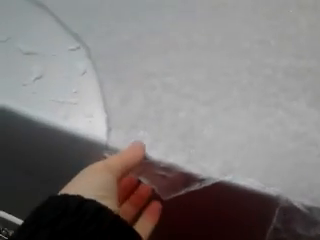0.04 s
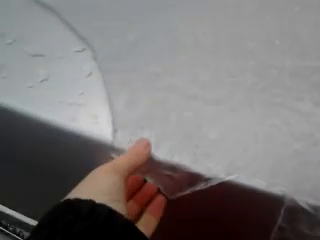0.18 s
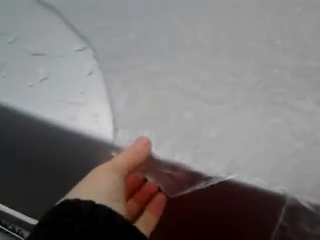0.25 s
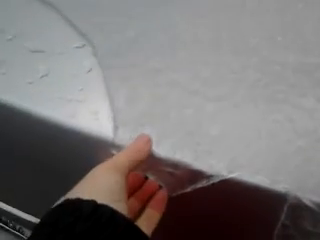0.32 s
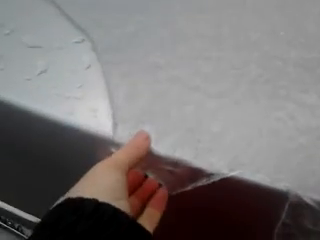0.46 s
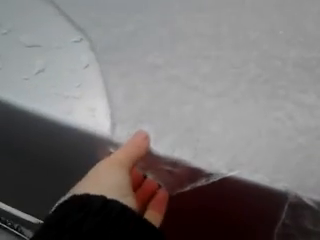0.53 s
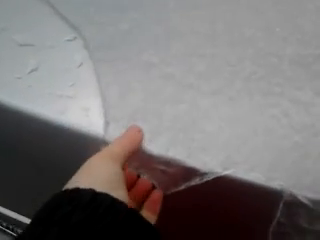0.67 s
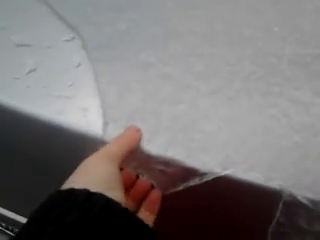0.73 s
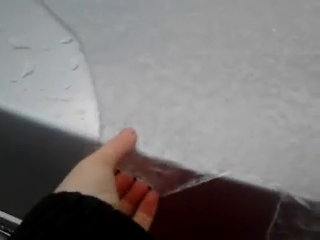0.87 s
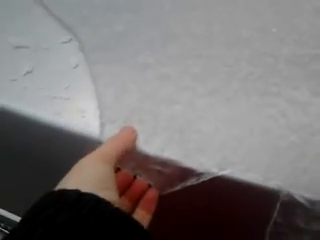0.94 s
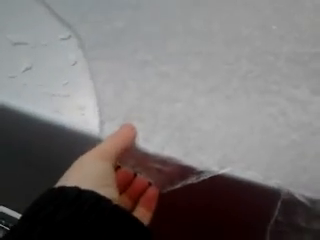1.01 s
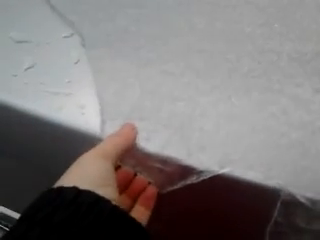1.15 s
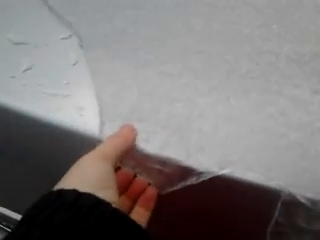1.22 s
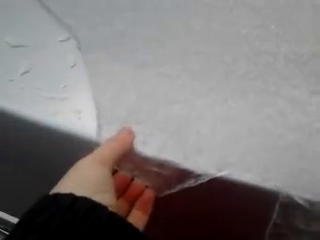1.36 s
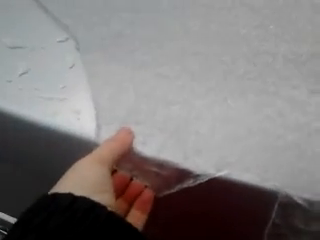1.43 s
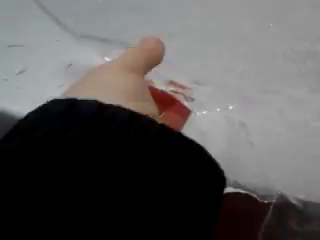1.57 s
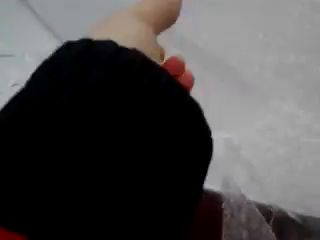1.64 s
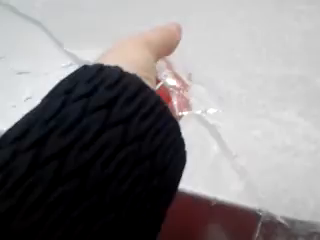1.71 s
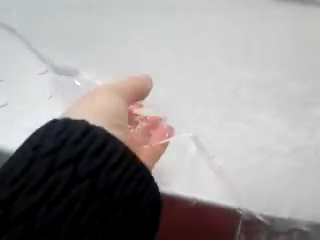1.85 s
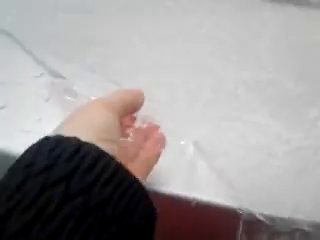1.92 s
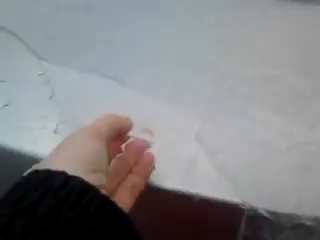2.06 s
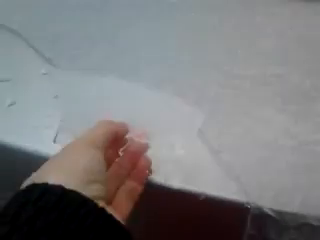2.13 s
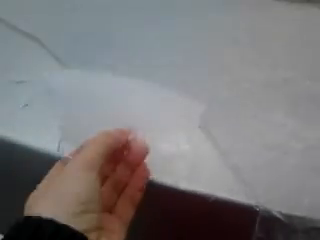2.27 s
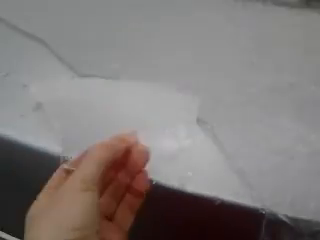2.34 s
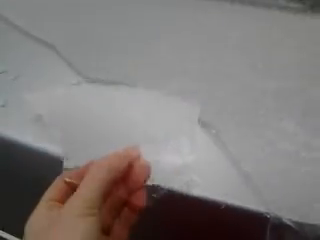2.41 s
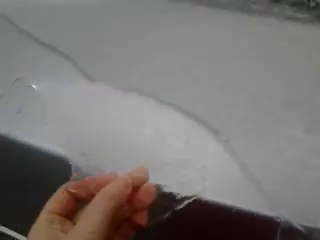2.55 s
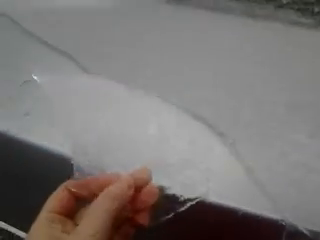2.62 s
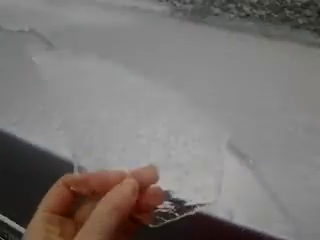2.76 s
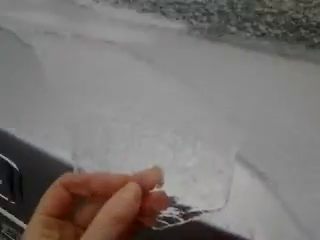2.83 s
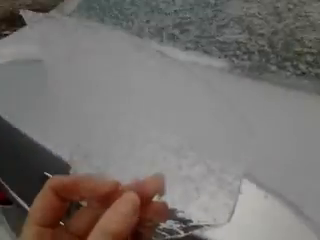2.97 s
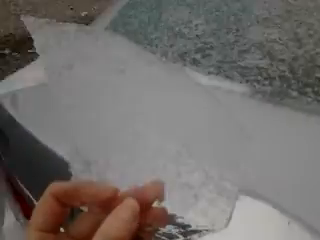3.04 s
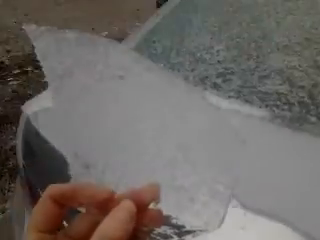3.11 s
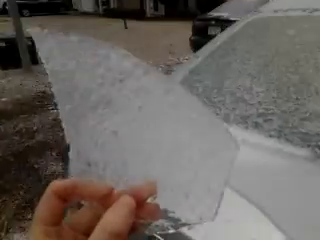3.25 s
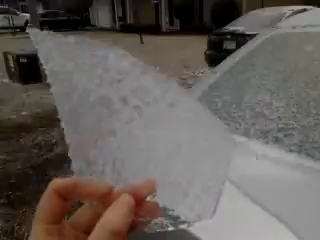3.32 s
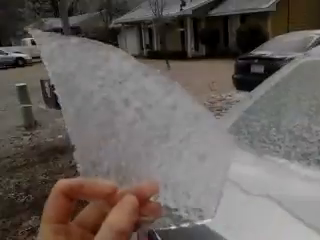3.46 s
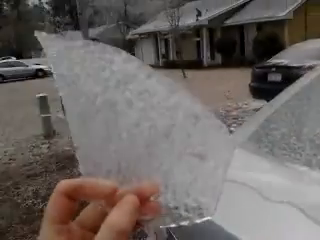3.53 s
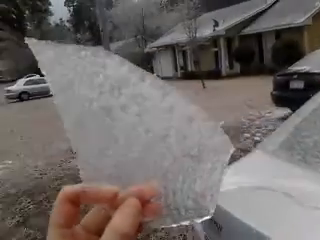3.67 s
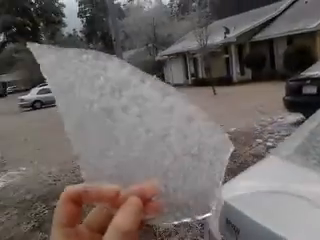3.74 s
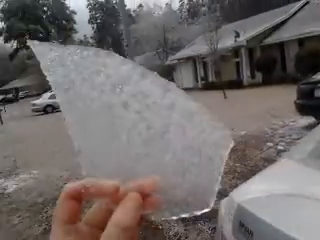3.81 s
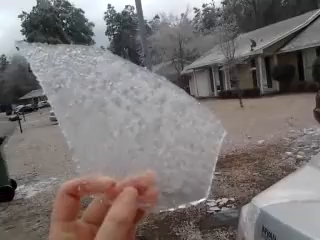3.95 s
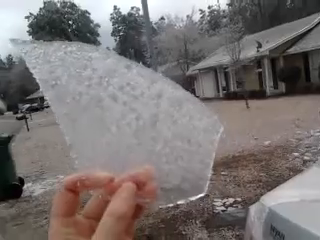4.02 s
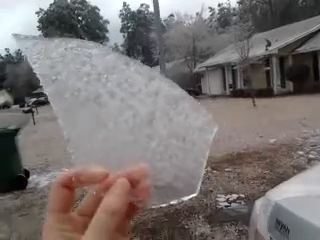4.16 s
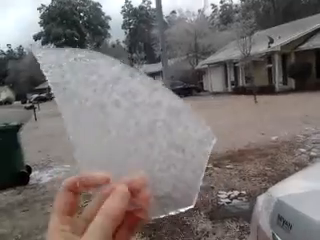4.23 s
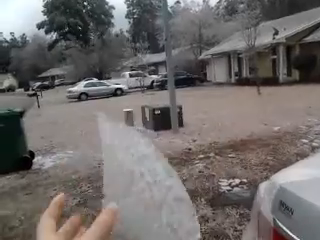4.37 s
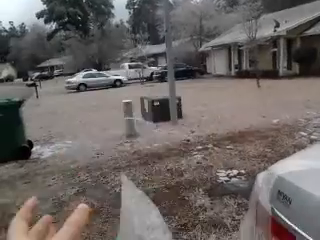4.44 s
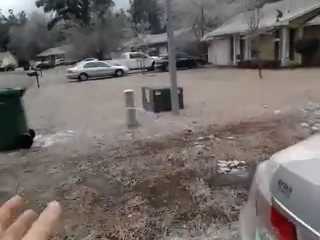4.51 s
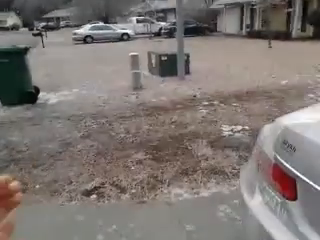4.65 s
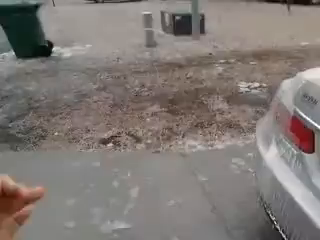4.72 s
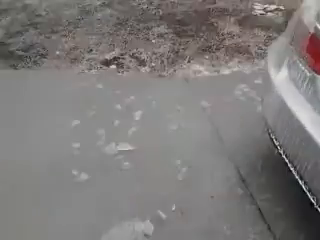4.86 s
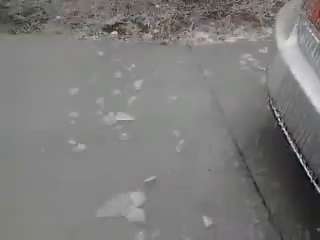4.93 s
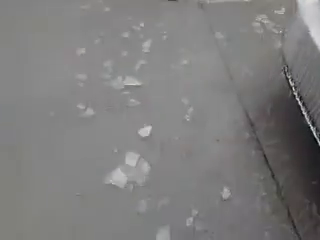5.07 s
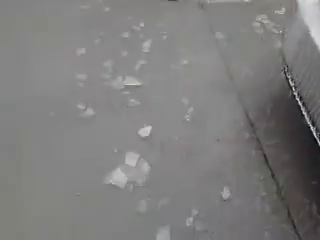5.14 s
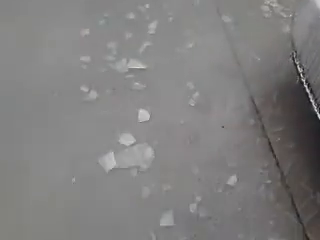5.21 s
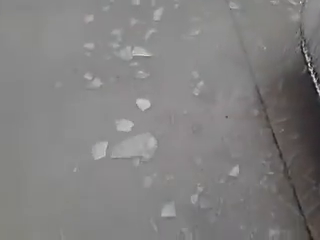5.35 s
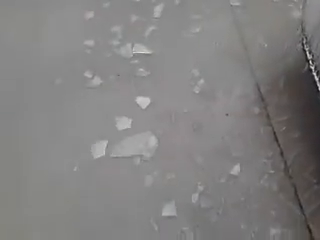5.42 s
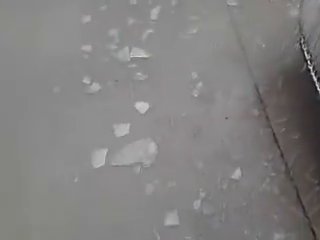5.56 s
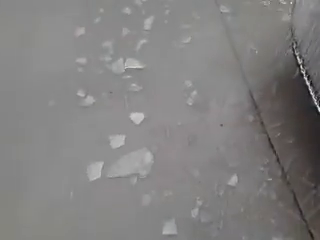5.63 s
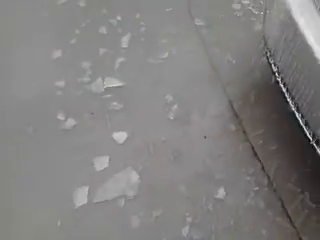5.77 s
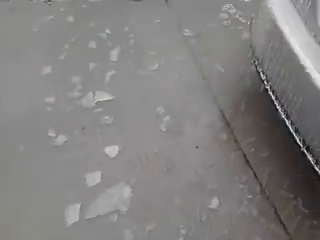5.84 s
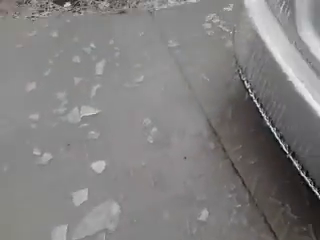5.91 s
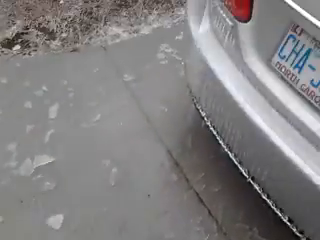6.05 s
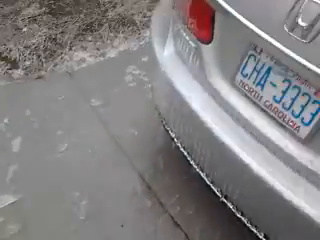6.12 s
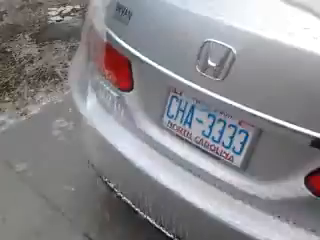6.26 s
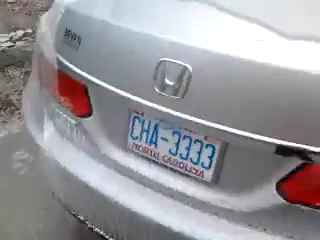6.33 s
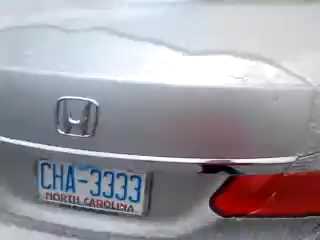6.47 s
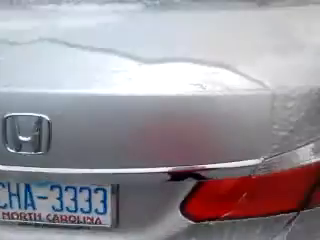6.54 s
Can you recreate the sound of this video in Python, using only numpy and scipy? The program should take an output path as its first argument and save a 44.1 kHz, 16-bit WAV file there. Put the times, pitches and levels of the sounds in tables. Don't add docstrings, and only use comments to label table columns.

```python
import sys
import numpy as np
from scipy import signal
from scipy.fft import rfft, irfft, next_fast_len
from scipy.io import wavfile
from scipy.ndimage import uniform_filter1d

SR = 44100
rng = np.random.default_rng(int(sys.argv[2]) if len(sys.argv) > 2 else 0)


def gain_from_decibels(decibels):
    exponent = np.asarray(decibels, float) / 20
    return 10 ** exponent


def persist_wave(psi):
    counts = np.round(np.clip(psi, -1, 1) * 32767).astype(np.int16)
    wavfile.write(sys.argv[1], SR, np.atleast_2d(counts).T)


N = 290619

# [f/Hz, level/dB]
HISS_SPECTRUM = [(290, -47), (500, 0.5), (687, -24), (760, -12), (841, -3), (1060, -2.5), (1170, -7),
                 (1940, -3.5), (2830, -11), (4900, -13), (7000, -6.5), (11200, -14), (15800, -20)]
STREET_SPECTRUM = [(12, -37), (20, -3), (145, -0.5), (189, -7.5), (258, -5), (375, -5.5), (497, -11.5),
                   (700, -13.5), (910, -13), (1540, -120)]
HISS_DB, STREET_DB = -57, -55.5

# [t/s, speed level/dB, pressure level/dB, length/s]
STROKES = [(.1, -36.5, -50.5, 0.024), (.15, -39, -46, 0.022), (.22, -39.5, -45.5, 0.017),
           (.35, -42.5, -51.5, 0.026), (.4, -50, -60, 0.0092), (.52, -40, -56, 0.013),
           (.585, -38.5, -52, 0.009), (.69, -45.5, -58, 0.024), (.74, -47.5, -50, 0.043),
           (.905, -43, -51, 0.041), (1.115, -39, -59, 0.022), (1.18, -57, -49.5, 0.027),
           (1.3, -54, -77, 0.11), (1.36, -42, -72, 0.016), (2.135, -59, -53, 0.029),
           (2.18, -64, -50.5, 0.031), (2.32, -48.5, -49, 0.027), (2.45, -52.5, -62, 0.065)]
# [t/s, speed level/dB, pressure level/dB, length/s]
HOLDS = [
    (.5, -59, -59, 0.98),
    (1.95, -58, -57.5, 0.4),
    (2.55, -60, -65.5, 0.04),
]
# [f/Hz, level/dB]
FIZZ_SPECTRUM = [(2650, -32), (3800, -18.5), (5400, -15.5), (6840, -8.5), (9270, -6), (11800, -7.5),
                 (14800, -16), (16000, -15), (16500, -50)]
SCRAPE_SPECTRUM = [(450, -30), (850, -5), (1300, -6), (2300, 1), (3600, -3), (5000, -15), (8000, -40)]
# [f/Hz, level/dB]
RUMBLE_SPECTRUM = [(35, -41), (60, 2.5), (220, 3.5), (308, 0), (651, -12.5), (800, -10), (1040, -31),
                   (1760, -120)]
LID_RUMBLE_DB = 1.5

# [t/s, level/dB, f/Hz]
CHIPS = [(.0028, -36.5, 3060), (.0216, -39, 3200), (.0408, -37, 2220), (.0694, -36, 2590),
         (.1126, -34, 2390), (.1556, -30, 1750), (.156, -28, 2800), (.576, -36, 2900), (.5814, -34, 2020),
         (.6175, -35, 2220), (.6815, -37, 2020), (.7568, -31.5, 2160), (.8483, -40, 1850),
         (.879, -37, 2550), (.9371, -33.5, 1740), (.9979, -39, 2460), (1.1524, -32, 3700),
         (1.1567, -35, 2220), (1.6704, -34, 3120), (1.689, -27, 3030), (1.7443, -33, 2450),
         (1.788, -18, 2060), (1.8005, -12, 2300), (1.806, -20, 1040), (1.828, -18, 2110), (1.838, -39, 900),
         (1.853, -35.5, 660), (1.868, -48, 775), (1.882, -46, 700), (2.1434, -30, 2330), (2.156, -35, 3100),
         (2.1913, -25.5, 2140), (2.2179, -42, 3020), (2.339, -32, 790), (2.548, -27, 1040),
         (2.356, -32, 3180), (2.4241, -36, 3360), (2.4552, -31, 3200), (3.551, -38, 330), (3.556, -43, 510),
         (3.565, -25.5, 2900), (3.568, -32, 1590), (3.569, -30.5, 815), (3.5842, -37, 1110),
         (3.5939, -34.5, 1770), (3.6516, -43, 2410), (3.934, -41, 3700), (3.934, -40, 5600),
         (4.0538, -38.5, 1150), (4.0962, -40, 3830), (4.0962, -42, 5800), (2.011, -29.5, 260),
         (2.012, -20.5, 860), (2.132, -28.5, 250), (2.199, -34, 262), (1.801, -25.5, 268), (.152, -33, 930),
         (6.368, -34.5, 1320), (6.5715, -34, 1590)]
# [t/s, level/dB]
FROST = [(.0465, -42), (0.0666, -36), (0.094, -32), (0.1533, -36), (0.304, -38), (.4538, -48), (.576, -37),
         (0.722, -37), (.7298, -41), (0.773, -40), (0.794, -37), (.8794, -43), (1.0153, -40.5),
         (1.126, -33), (1.2574, -40), (1.3523, -33), (1.429, -38), (2.143, -43), (2.653, -36), (3.138, -37),
         (3.586, -45), (3.935, -44), (4.0963, -38), (4.3112, -40), (5.227, -44), (5.243, -38), (5.267, -39),
         (1.555, -37), (1.69, -35), (2.0037, -36), (4.8338, -30), (5.155, -30), (5.311, -42), (5.197, -41),
         (5.422, -41), (5.841, -39.5)]
# [t/s, level/dB, f/Hz]
SNAPS = [(.2185, -18, 2520), (.336, -13, 7960), (1.6945, -3.5, 2900), (1.6945, -20, 6800),
         (1.776, -12, 7650), (1.8275, -12, 7200), (1.738, -26, 6860), (1.7385, -12.5, 2780),
         (2.0064, -2, 2550), (2.0066, -13, 8500), (2.011, -12, 2900), (2.55, -13.5, 7700),
         (4.9882, -6, 5740), (1.566, 10, 6800), (1.5735, 1, 2850), (4.8385, -3, 1000), (4.8565, -15, 7200),
         (5.027, 4.5, 6270), (2.2, -28, 2060), (2.3045, -23, 7500), (.2075, -28, 2000), (5.0765, -12, 3970)]

# [t/s, plate level/dB, bright edge level/dB]
TICKS = [(0.056, -42.5, -35), (0.086, -49, -36), (0.1033, -46, -37), (0.1433, -47, -31),
         (0.2085, -31.5, -31.5), (0.218, -35.5, -28.5), (.287, -41.5, -43), (0.3161, -38.5, -34),
         (0.3363, -40.5, -28), (0.3552, -38, -41), (0.3712, -39, -36.5), (0.495, -73, -39), (.52, -63, -44),
         (0.5848, -45, -38), (0.6715, -40.5, -35.5), (.708, -67, -40), (0.7427, -38, -40.5),
         (0.888, -47, -38), (0.904, -64, -39), (0.936, -42, -59), (0.967, -48, -43), (1.096, -47, -36.5),
         (1.112, -66, -40), (1.144, -36.5, -33.5), (1.1652, -39.5, -36), (1.213, -43.5, -43),
         (1.295, -48.5, -37), (1.3186, -55, -35.5), (1.364, -50, -40)]
# [t/s, plate level/dB, bright edge level/dB]
SLIPS = [
    (1.722, -41, -36),
    (2.112, -48.5, -46.5),
    (2.17, -37.5, -57),
    (2.1915, -53, -49),
    (2.1975, -42, -40.5),
    (2.34, -49, -60),
    (2.356, -45, -39),
    (2.398, -49, -41),
    (2.4467, -39.5, -39),
]
# [t/s, plate level/dB, bright edge level/dB]
HANDLING = [
    (2.9632, -47, -44),
    (2.9885, -43, -39),
    (3.568, -30.5, -43),
    (3.593, -51, -53),
    (3.6388, -43.5, -45),
    (3.9564, -43, -53),
    (4.026, -46, -46),
    (4.3161, -46, -43.5),
]
# [t/s, plate level/dB, bright edge level/dB]
STEPS = [
    (5.781, -42.5, -38),
    (5.92, -43, -41.5),
    (6.368, -40.5, -37.5),
    (6.39, -44, -50),
    (6.571, -42.5, -38),
    (6.586, -55, -40),
]
# [t/s, level/dB]
BUMPS = [(.07, -39.5), (0.146, -40), (1.1653, -47), (1.22, -42), (1.6693, -44), (1.708, -29), (1.848, -51),
         (2.155, -50), (2.34, -38), (4.06, -49), (4.512, -53), (5.894, -41), (5.996, -44.5), (6.14, -48)]
KNOCK_UNDER_DB = 8

# [t/s, plate level/dB, bright edge level/dB, low knock level/dB, length/ms]
CRACKS = [(1.5597, -17, -18, -34, 2.1), (1.5652, -11.5, -10.5, -26.5, 1.2), (1.5716, -4.5, -15, -21, 1.36),
          (1.6141, -37, -44, -41, 7.8), (1.6943, -12, -16, -28, 1.94), (1.738, -22, -26, -43, 0.64),
          (1.7747, -19.5, -20, -34, 2.5), (1.788, -46, -34, -51, 3.8), (1.8006, -22, -28, -25, 2.8),
          (1.8277, -32, -27.5, -24.5, 1.44), (2.007, -19.5, -20.5, -26.5, 1.7),
          (2.0116, -24, -19.5, -27, 0.84), (2.1293, -36, -36.5, -36.5, 1.6), (2.1784, -41, -46, -48, 2.9),
          (2.3043, -37.5, -34.5, -63, 2.4), (2.3179, -55, -39, -42.5, 4), (2.4552, -30.5, -34, -66, 0.57),
          (2.548, -34, -37, -35.5, 3)]
# [t/s, level/dB]
THUMPS = [(1.5647, -26.5), (1.5723, -23), (1.669, -40), (1.6944, -32), (1.7186, -30.5), (1.7733, -28.5),
          (1.789, -26), (1.801, -26.5), (1.812, -39), (1.8255, -39), (2.008, -54), (2.1303, -34),
          (2.192, -42), (2.1974, -39)]
THUMP_MS = 7.3
# [f/Hz, level/dB]
EDGE_SPECTRUM = [(2940, -55), (5000, -17.5), (7020, -2.5), (8200, -4.5), (9060, -2), (10800, -13.5),
                 (14300, -15), (16500, -55)]
# [f/Hz, width/Hz, level/dB]
PLATE_MODES = [(1854, 920, -0.5), (2900, 1410, 1.5), (4420, 1510, 1.5), (4970, 1500, -9.5)]
KNOCK_MODES = [(406, 237, -4), (850, 650, 2), (1310, 2500, -7)]
LID_MODES = [(125, 38, 1), (250, 50, -3.5), (330, 89, -4.5)]
DEBRIS_MODES = [(1230, 3300, -9.5), (2970, 980, 3), (3760, 1300, 0.5), (5000, 1160, 1), (5860, 3500, -9.5)]
# [t/s, fizz level/dB, body level/dB, length/s]
SPILLS = [
    (1.578, -34, -44, 0.02),
    (1.605, -47, -50, 0.069),
    (1.7, -47.5, -38, 0.069),
    (1.79, -37.5, -57, 0.033),
    (4.862, -29, -29.5, 0.033),
    (4.95, -53, -43.5, 0.078),
    (5.05, -36.5, -35.5, 0.15),
    (5.18, -53, -45.5, 0.13),
    (5.35, -46.5, -46, 0.058),
]

# [t/s, bright level/dB, dull level/dB, length/s]
SWINGS = [(2.97, -51.5, -52.5, 0.32), (3.14, -51, -53.5, 0.086), (3.35, -59, -63, 0.13),
          (3.56, -50, -49, 0.028), (3.68, -51.5, -62, 0.074), (4.05, -58.5, -56.5, 0.49),
          (4.45, -64, -75, 0.17), (4.81, -44.5, -53, 0.22), (5.68, -50.5, -52, 0.019),
          (5.79, -46.5, -53, 0.043), (6.23, -60, -49, 0.19), (6.52, -53.5, -56.5, 0.88)]
# [t/s, level/dB, length/s]
GRIPS = [
    (2.72, -65, 0.19),
    (3.17, -46, 0.057),
    (3.56, -44.5, 0.02),
    (5.79, -51, 0.062),
    (6, -58.5, 0.22),
    (6.49, -50.5, 0.032),
]
# [f/Hz, level/dB]
WEAVE_SPECTRUM = [(2710, -21), (4600, -14), (4840, -17), (6210, -8.5), (7210, -1.5), (8860, -4),
                  (10500, -8.5), (12300, -6), (15800, -11)]
FOLDS_SPECTRUM = [(350, -64), (600, -1), (879, -4.5), (1040, -1), (1650, -1.5), (2150, 2), (3400, -4.5),
                  (4700, -8), (6500, -13.5), (11000, -120)]

# [t/s, peak level/dB, f/Hz]
SPLINTER = [(3.8864, -36, 8400), (3.933, -39, 8300), (3.9883, -33, 8330), (4.032, -31, 7600),
            (4.097, -27, 8500), (4.2278, -39, 8250), (3.999, -44, 8200), (4.012, -45, 8300),
            (4.024, -41, 8400), (4.035, -36, 6900), (4.037, -35, 8540), (4.108, -43, 8550),
            (4.124, -45, 8500), (3.945, -53, 8400)]

# [t/s, plate level/dB, bright edge level/dB, low knock level/dB, length/ms]
BURST = [(4.8378, -6.5, -12.5, -11.5, 2.46), (4.8458, -7, -7, -40, 0.72), (4.8526, -10, -15, -57, 6.0),
         (4.855, -14.5, -9, -42, 4.1), (4.8654, -22, -44, -46, 1.3), (4.89, -42, -37.5, -47, 2.7),
         (4.948, -56, -34, -47, 2.4), (4.9796, -40, -37, -43.5, 2.1), (4.989, -39, -38, -52, 1.74),
         (4.991, -34, -29, -44.5, 3.8), (5.0148, -41, -29, -46, 4.8), (5.0257, -20, -15, -44, 3.5)]
# [t/s, level/dB, f/Hz]
RATTLE = [(4.891, -22, 5500), (4.911, -36, 2580), (4.9485, -23, 5160), (4.9615, -31, 3220),
          (5.0165, -15, 4350), (5.1535, -28, 4300), (5.1561, -28, 4970), (5.166, -27, 3300),
          (5.1854, -23, 3360), (5.1978, -26, 3620), (5.2225, -31, 3500), (5.2553, -37, 3530),
          (5.2755, -26, 3740), (5.2937, -22, 3140), (5.2992, -20.5, 3080), (5.3334, -40, 1260),
          (5.339, -36, 3300), (5.35, -32, 3000), (5.362, -38, 1030), (5.4069, -34, 2990),
          (5.4215, -30, 3190), (5.4487, -38, 4780), (5.4737, -32, 3340), (5.5482, -45, 3510),
          (5.101, -35, 4270), (5.111, -19, 6200), (5.1165, -22, 4960), (5.045, -30, 4340),
          (5.2985, -27, 7350), (5.431, -30, 4570), (5.293, -29, 4400)]
# [t/s, ring level/dB, bright edge level/dB, f/Hz]
SHARDS = [(4.9363, -30, -38, 2870), (4.9639, -29.5, -40, 3130), (5.0655, -29, -40, 2900),
          (5.0686, -29, -38, 3460), (5.0765, -25, -33, 3610), (5.086, -29, -39, 3020),
          (5.111, -27, -46, 3520), (5.117, -33, -38.5, 2900), (5.131, -39, -44, 3570),
          (5.1388, -30, -46, 2820), (5.145, -33, -41, 2970), (5.1611, -29.5, -38, 2700),
          (5.1797, -24.5, -35, 3700), (5.197, -38, -51, 3760), (5.219, -32.5, -51, 3370),
          (5.238, -34, -46, 3500), (5.2555, -38, -46, 3430), (5.274, -33, -49, 3420),
          (5.28, -36, -42, 3100), (5.29, -32, -51, 2900), (5.299, -29.5, -38, 3040),
          (5.3265, -39, -48, 3260), (5.346, -30.5, -34, 2570), (5.362, -40, -58, 2830),
          (5.3725, -28, -34, 2870), (5.383, -32, -38, 2760), (5.427, -36, -41, 3630),
          (5.438, -32.5, -38, 3100), (5.455, -38, -48, 3440), (5.496, -38, -52, 2940)]

# [f/Hz, t60/s]
ECHO_DECAY = [(300, 0.19), (2500, 0.072), (10000, 0.035)]

# [f/Hz, level/dB]
BAND_LOSS = [(1200, -25), (2000, -9), (3300, -2.6), (4700, -.5), (6000, -2.4), (8000, -5), (10500, -1.4),
             (13000, 0), (15500, .3)]
# [from t/s, to t/s]
CLICK_STRETCHES = [(.035, .05), (.16, .205), (.295, .35), (.655, .67), (1.082, 1.095), (1.275, 1.292),
                   (1.678, 1.69), (1.752, 1.772), (1.805, 1.822), (2.015, 2.022), (2.112, 2.145),
                   (2.385, 2.445), (2.535, 2.547), (3.922, 3.935), (4.09, 4.11), (4.922, 5.022),
                   (5.158, 5.202), (5.35, 5.44), (5.485, 5.5), (6.355, 6.367), (6.565, 6.585)]
TOP_HZ, QUIET_TOP_HZ = 16300, 15750


def unit(x):
    return x / np.sqrt(np.mean(x ** 2) + 1e-20)


def along(points, hz):
    f, v = np.transpose(points)
    return np.interp(np.log(hz + 1), np.log(f + 1), v)


def filtered(x, response):
    m = next_fast_len(N + SR // 2)
    hz = np.fft.rfftfreq(m, 1 / SR)
    return irfft(rfft(x, m) * response(hz), m)[:N]


def coloured(x, spectrum):
    return filtered(x, lambda hz: unit(gain_from_decibels(along(spectrum, hz))))


def resonant(x, modes):
    def response(f):
        h = 0
        for k, (centre, width, db) in enumerate(modes):
            damping = 1j * f * width
            h = h + (-1) ** k * gain_from_decibels(db) * damping / (centre * centre - f * f + damping)
        return h / np.sqrt(np.mean(abs(h) ** 2))
    return filtered(x, response)


def gritty(per_s, spread_db, share):
    size_db = spread_db * np.minimum(rng.exponential(1, N), 3)
    hits = (rng.random(N) < per_s / SR) * gain_from_decibels(size_db)
    grains = np.convolve(hits, np.hanning(110))[:N]
    share = np.clip(share, 0, 1)
    rough = unit(grains * rng.standard_normal(N))
    return np.sqrt(share) * rough + np.sqrt(1 - share) * rng.standard_normal(N)


def swells(rows, rise, fall):
    s, *dbs, length = np.transpose(rows)
    t = np.arange(0, N + 32, 32) / SR
    u = (t - s[:, None]) / np.maximum(length, .005)[:, None]
    power = np.exp(-np.where(u < 0, (u / rise) ** 2, abs(u) / fall))
    gains = np.sqrt(gain_from_decibels(2 * np.array(dbs)) @ power)
    return [np.interp(np.arange(N) / SR, t, gain) for gain in gains]


def bursts(times, dbs, widths_ms, rise=0.84, fall=0.99):
    out = np.zeros(N + SR)
    t = np.arange(-SR // 100, SR // 16) / SR
    noise = rng.standard_normal((len(times), len(t)))
    for s, db, ms, grain in zip(times, dbs, widths_ms, noise):
        u = 1000 * t / max(ms, .5)
        shape = np.where(u < 0, np.exp(-(u / rise) ** 2), np.exp(-abs(u) / fall))
        out[round(s * SR):][:len(t)] += gain_from_decibels(db) * shape * grain
    return out[SR // 100:][:N]


def rings(times, dbs, hzs, t60_s, rise_s):
    out = np.zeros(N + SR)
    t = np.arange(SR // 16) / SR
    for s, db, hz, t60, rise in np.broadcast(times, dbs, hzs, t60_s, rise_s):
        shape = gain_from_decibels(db - 60 * t / t60) * (1 - np.exp(-(t / rise) ** 2))
        out[round((s - 1.5 * rise) * SR):][:len(t)] += shape * np.sin(2 * np.pi * hz * t)
    return out[:N]


def ringing_pieces(rows, decay_cycles, onset_cycles):
    s, db, hz = np.transpose(rows)
    return rings(s, db + 5.0, hz, decay_cycles / hz, onset_cycles / hz)


def fractures(s, body_db, edge_db, knock_db, width_ms, lift_db, knock_lift_db):
    body = resonant(bursts(s, body_db + lift_db, width_ms), PLATE_MODES)
    bright = coloured(bursts(s, edge_db + lift_db, 1.11 * width_ms), EDGE_SPECTRUM)
    low = resonant(bursts(s, knock_db + knock_lift_db, 1.59 * width_ms, rise=0.53), KNOCK_MODES)
    return body + bright + low


def air():
    hiss, rumble = rng.standard_normal((2, N))
    return gain_from_decibels(HISS_DB) * coloured(hiss, HISS_SPECTRUM) + gain_from_decibels(STREET_DB) * coloured(rumble, STREET_SPECTRUM)


def drag():
    speed, pressure = swells(STROKES + HOLDS, rise=0.69, fall=0.81)
    grit = gritty(500, spread_db=3, share=0.3)
    fizz = coloured(grit, FIZZ_SPECTRUM)
    scrape = coloured(grit, SCRAPE_SPECTRUM)
    rumble = coloured(gritty(130, spread_db=1.5, share=0.16), RUMBLE_SPECTRUM)
    return speed * fizz + pressure * (gain_from_decibels(-3.0) * scrape + gain_from_decibels(LID_RUMBLE_DB) * rumble)


def chips():
    return ringing_pieces(CHIPS, decay_cycles=16, onset_cycles=1.2)


def frost():
    s, db = np.transpose(FROST)
    return coloured(bursts(s, db, np.full(len(s), .9)), EDGE_SPECTRUM)


def ticks():
    s, body, edge = np.transpose(TICKS + SLIPS + HANDLING + STEPS)
    small = fractures(s, body, edge, body - KNOCK_UNDER_DB, np.full(len(s), 1.9),
                      lift_db=1.0, knock_lift_db=-2.0)
    at, db = np.transpose(BUMPS)
    bumps = resonant(bursts(at, db, np.full(len(at), 3.5), rise=0.46), KNOCK_MODES)
    return bumps + small


def snaps():
    return ringing_pieces(SNAPS, decay_cycles=9, onset_cycles=.6)


def cracks():
    s, db = np.transpose(THUMPS)
    lid = resonant(bursts(s, db + 3.0, np.full(len(s), THUMP_MS), rise=0.5), LID_MODES)
    lid = filtered(lid, lambda hz: 1j * hz / (1j * hz + 80))
    return lid + fractures(*np.transpose(CRACKS), lift_db=0.0, knock_lift_db=1.0)


def crumbs():
    fizzing, crunching = swells(SPILLS, rise=0.47, fall=0.51)
    fizz = coloured(gritty(500, spread_db=1.5, share=0.55), EDGE_SPECTRUM)
    body = resonant(gritty(450, spread_db=2.5, share=0.71), DEBRIS_MODES)
    return gain_from_decibels(-3.0) * fizzing * fizz + gain_from_decibels(-4.0) * crunching * body


def coat():
    bright, dull = swells(SWINGS, rise=0.53, fall=0.79)
    hand, = swells(GRIPS, rise=0.4, fall=0.99)
    rub = gritty(600, spread_db=4.0, share=0.17)
    grip = coloured(gritty(88, spread_db=10.0, share=0.19), RUMBLE_SPECTRUM)
    return bright * coloured(rub, WEAVE_SPECTRUM) + dull * coloured(rub, FOLDS_SPECTRUM) + hand * grip


def splinter():
    s, db, hz = np.transpose(SPLINTER)
    return rings(s, db - 1, hz, t60_s=0.014, rise_s=0.00045)


def burst():
    s, body, edge, knock, width = np.transpose(BURST)
    push_modes = [(150, 130, 0), (930, 250, 1)]  # f/Hz, width/Hz, level/dB
    push = resonant(bursts(s, knock - 12, 2.0 * width, rise=0.24), push_modes)
    breaking = fractures(s, body, edge, knock, np.minimum(width, 3.5), lift_db=-1.0, knock_lift_db=-4.0)
    return push + breaking


def rattle():
    return ringing_pieces(RATTLE, decay_cycles=22, onset_cycles=1.6)


def shards():
    s, body, edge, hz = np.transpose(SHARDS)
    detune = 1 + 0.072 * rng.standard_normal((len(s), 2)).T
    near, upper = hz * [[.9], [2.2]] * detune
    ring = rings(s, body + 9, hz, t60_s=0.013, rise_s=0.00098)
    ring += rings(s, body + 3, near, t60_s=0.0044, rise_s=0.00116)
    ring += rings(s, edge + 3, upper, t60_s=0.0047, rise_s=0.00086)
    click = resonant(bursts(s, body - 3, np.full(len(s), 1.6)), DEBRIS_MODES)
    bright = bursts(s, edge - 4, np.full(len(s), 1.3))
    bright = coloured(coloured(bright, EDGE_SPECTRUM), EDGE_SPECTRUM)
    return ring + click + bright


def echo(x):
    hz, t, z = signal.stft(rng.standard_normal(SR // 4), SR, nperseg=128)
    decay = gain_from_decibels(-60 * t / along(ECHO_DECAY, hz)[:, None])
    tail = signal.istft(z * decay, SR, nperseg=128)[1]
    return signal.fftconvolve(np.pad(x, (130, 0)), tail / np.linalg.norm(tail))[:N]


def scene():
    lid, ground = ticks() + cracks(), burst() + shards()
    wet = gain_from_decibels(-13.0) * echo(lid) + gain_from_decibels(-17.0) * echo(ground)
    pieces = chips() + frost() + snaps() + rattle()
    return (lid + ground + wet + crumbs() + drag() + coat() + splinter() + air() + pieces)[None]


def thin_quiet_bands(x):
    hz, _, z = signal.stft(x, SR, nperseg=1024)
    power = uniform_filter1d(uniform_filter1d(abs(z) ** 2, size=4, axis=0), size=3, axis=1)
    around = np.exp(uniform_filter1d(np.log(power + 1e-16), size=41, axis=0))
    total = power.sum(axis=0)
    limit = around * gain_from_decibels(2 * along(BAND_LOSS, hz))[:, None]
    weak = (power < limit) & (total < gain_from_decibels(-70))
    weak |= (hz > QUIET_TOP_HZ)[:, None] & (total < gain_from_decibels(-59))
    return signal.istft(np.where(weak, .04 * z, z), SR, nperseg=1024)[1][:N]


def thin_click_treble(x):
    hz, t, z = signal.stft(x, SR, nperseg=256)
    power = uniform_filter1d(uniform_filter1d(abs(z) ** 2, size=5, axis=0), size=2, axis=1)
    level = np.log(power + 1e-16)
    usual = uniform_filter1d(uniform_filter1d(level, size=15, axis=0), size=4, axis=1)
    clicking = sum((t > start) & (t < end) for start, end in CLICK_STRETCHES) > 0
    faint = level < usual - .55 + hz[:, None] / 18000
    weak = clicking & faint & (hz > 3600)[:, None]
    return signal.istft(np.where(weak, .08 * z, z), SR, nperseg=256)[1][:N]


def top_cut(x):
    return signal.sosfilt(signal.butter(12, 16970, fs=SR, output="sos"), x)


def record(dry):
    top = .58
    soft = dry[0] / (1 + abs(dry[0] / top) ** 6) ** (1 / 6)
    soft = filtered(soft, lambda hz: hz < TOP_HZ)
    mix = thin_click_treble(thin_quiet_bands(soft))[None]
    return top_cut(mix)


dry = scene()
out = record(dry)
persist_wave(out)
```